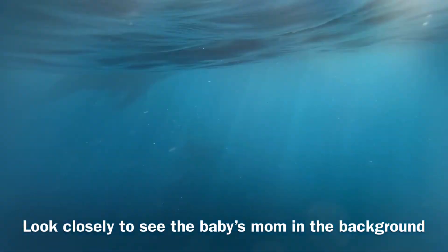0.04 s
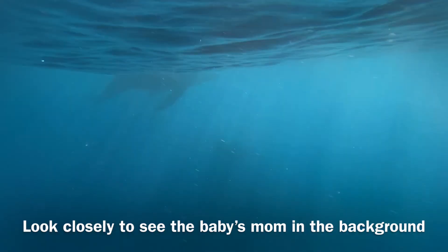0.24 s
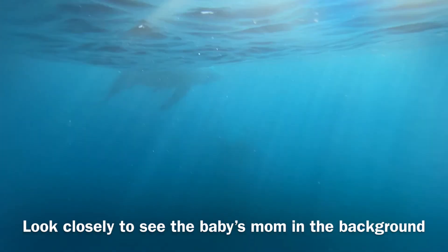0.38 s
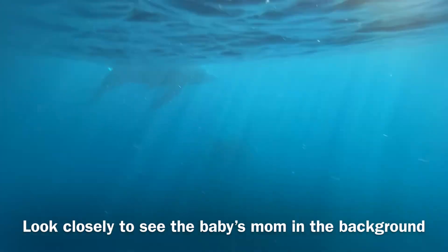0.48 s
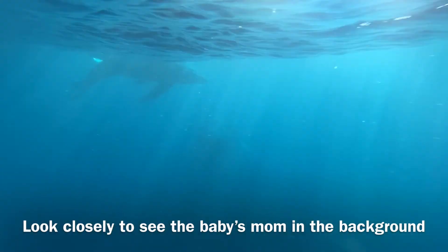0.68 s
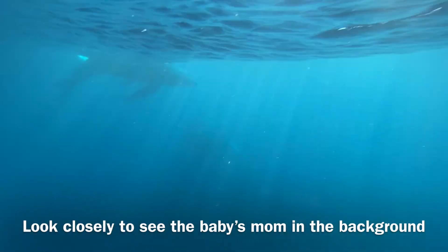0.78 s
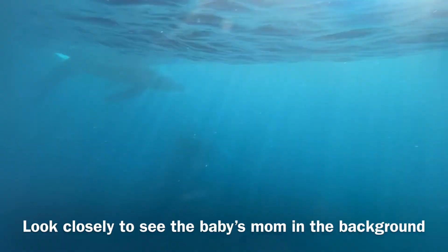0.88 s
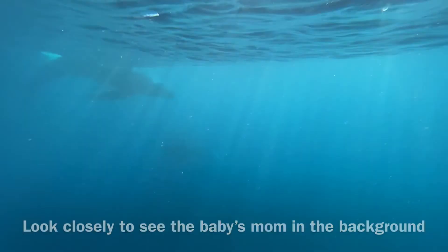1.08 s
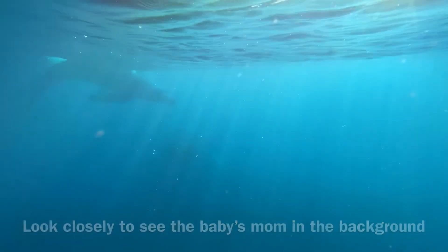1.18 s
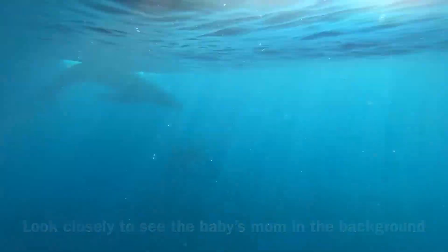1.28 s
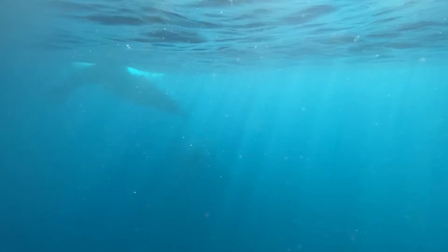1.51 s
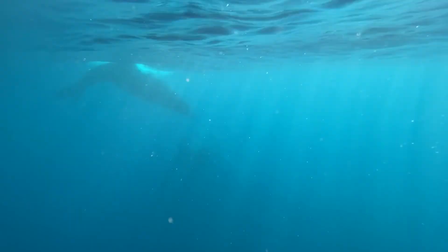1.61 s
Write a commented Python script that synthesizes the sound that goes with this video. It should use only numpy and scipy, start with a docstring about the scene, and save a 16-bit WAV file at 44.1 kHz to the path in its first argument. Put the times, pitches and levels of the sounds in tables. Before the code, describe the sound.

Close underwater stereo sound in open sea: a nasal, droning whale moan swells and creeps upward with faint throbs and small bubble blips, then loud deep glugs break over its end, leaving quiet sloshing water.

```python
"""A whale's held moan under water, close to a camera housing that hears through a left and a right port.
The moan is a summed fundamental and overtones: its pitch creeps up through fixed resonances and pulses make it buzzy.
Low throbs, single swings of pressure, pulse under it; single bubbles small and large ring, and ticks die at once.
Behind it water sloshes as shaped noise, and a burst of big bubbles, many short rings, gurgles and dies away."""
import sys
import numpy as np
from scipy import signal
from scipy.fft import rfft, irfft, next_fast_len
from scipy.io import wavfile
from scipy.ndimage import uniform_filter1d, minimum_filter1d, map_coordinates

SR = 44100
rng = np.random.default_rng(int(sys.argv[2]) if len(sys.argv) > 2 else 0)


def wrap_up_sound(samples):
    """Save the sound to the file named by the first command line argument, as 16-bit audio."""
    columns = np.atleast_2d(samples).T
    # keep every value between -1 and 1, then stretch to whole-number steps
    tamed = np.clip(columns, -1, 1)
    steps = np.round(tamed * 32767).astype(np.int16)
    wavfile.write(sys.argv[1], SR, steps)


N = 72765


def amp(db):
    """Decibels to a linear factor."""
    return 10 ** (np.asarray(db) / 20)


def unit(x):
    """x at an RMS level of one."""
    return x / np.sqrt(np.mean(x ** 2) + 1e-20)


def along(points, hz):
    """Read (frequency [Hz], value) points on a log frequency axis."""
    f, v = np.transpose(points)
    return np.interp(np.log(hz + 1), np.log(f + 1), v)


def curves(rows):
    """One value per sample for each column after the time."""
    s, *cols = np.transpose(rows)
    return [np.interp(np.arange(N) / SR, s, c) for c in cols]


def wobble(rate, count=1):
    """Random curves made of straight lines between knots, rate knots a second."""
    knots = rng.standard_normal((count, 200))
    return [np.interp(np.arange(N) * rate / SR, np.arange(200), row) for row in knots]


def filtered(x, response):
    """x times a complex response of frequency; mirrored ends run out smoothly so that they do not click."""
    edge = 4096
    x = np.pad(x, [(0, 0)] * (x.ndim - 1) + [(edge, edge)], mode="reflect")
    x = x * signal.windows.tukey(N + 2 * edge, 2 * edge / (N + 2 * edge))
    m = next_fast_len(N + 2 * edge)
    return irfft(rfft(x, m) * response(np.fft.rfftfreq(m, 1 / SR)), m)[..., edge:edge + N]


def add(track, s, sound):
    """Mix a short sound in at a time in seconds."""
    part = track[max(round(s * SR), 0):][:len(sound)]
    part += sound[:len(part)]


def patchy(x, db):
    """x with slowly shifting patches of random gain over time and frequency."""
    z = signal.stft(x, nperseg=512, boundary="even")[2]
    field = uniform_filter1d(rng.standard_normal(z.shape), size=6, axis=0)
    field = uniform_filter1d(field, size=10, axis=1)
    return signal.istft(z * amp(db * unit(field)), nperseg=512)[1][:N]


PATCHY_DB = 4  # spread of the patches in the slosh and the breath

# Gurgling at the housing, before the mix: (time [s], level [dB])
GURGLE_LEVEL = [(0, -47.5), (.06, -45), (.13, -40), (.3, -31), (.925, -32.5), (.955, -11.5), (1.03, -14.5),
                (1.13, -15.5), (1.22, -20), (1.33, -25.5), (1.45, -34), (1.55, -37.5), (1.65, -37)]
# Colour of the sloshing water: (frequency [Hz], gain [dB])
SLOSH_COLOUR = [(15, -48.5), (25, -29.5), (60, 13), (120, -17), (250, -10.5), (320, -13), (380, -20.5),
                (500, -32.5), (800, -26), (1100, -41.5), (8500, -71.5), (10500, -76.5)]
SLOSH_DB, SLOSH_GROWS = -7, 0.44  # against the loudest gurgle; share of its dB swing that the slosh follows
GLUG_COUNT, GLUG_HZ, GLUG_SPREAD = 500, 183.1, 0.464  # middle pitch [Hz]; spread in log pitch
GLUG_CYCLES, GLUG_SIZE_DB = 1.65, 2  # cycles in one unit of decay time; scale of the random extra level


def gurgle():
    """Big bubbles ring for a few cycles over sloshing water, whose level swings less."""
    level_db, = curves(GURGLE_LEVEL)
    glugs, t = np.zeros(N), np.arange(3000) / SR
    for s, pitch, size in rng.random((GLUG_COUNT, 3)):
        hz = GLUG_HZ * np.exp(GLUG_SPREAD * np.log(pitch / (1 - pitch)) / 2)
        u = t * hz / GLUG_CYCLES
        swell_and_decay = u * np.exp(-np.e * u)
        loudness = amp(-GLUG_SIZE_DB * np.log(size))
        add(glugs, s * N / SR, loudness * swell_and_decay * np.sin(2 * np.pi * hz * t))
    glugs = filtered(glugs, lambda f: 1 / (1 + (f / 340) ** 8))  # dull above 340 Hz
    slosh = filtered(rng.standard_normal(N), lambda f: amp(along(SLOSH_COLOUR, f)))
    slosh = patchy(slosh, PATCHY_DB)
    loudest = level_db.max()
    slosh_db = SLOSH_DB + loudest + SLOSH_GROWS * (level_db - loudest)
    return amp(level_db) * unit(glugs) + amp(slosh_db) * unit(slosh)


BLIP_RISE, BLIP_ATTACK_S = 0.053, 0.0015  # rise of the mean pitch over one t60 [share]; attack [s]
BLIP_ROUGH, BLIP_ROUGH_HZ = 0.077, 150  # depth of the unsteady level; knots a second


def bubble(db, hz, t60):
    """A bubble's soft-starting, unsteady ring: it dies away exponentially and its pitch rises a little."""
    t = np.arange(8000) / SR
    rough = 1 + BLIP_ROUGH * map_coordinates(rng.standard_normal(100), [t * BLIP_ROUGH_HZ])
    attack = (1 - np.exp(-t / BLIP_ATTACK_S)) ** 2
    cycles = hz * t * (1 + BLIP_RISE * t / t60)
    return amp(db - 60 * t / t60) * attack * rough * np.sin(2 * np.pi * cycles)


# Ringing bubbles small and large, before attack and mix:
# (time [s], level [dB], starting pitch [Hz], decay by 60 dB [s])
BUBBLES_HEARD = [(.388, 0, 586, 0.0064), (.452, 5, 316, 0.021), (.533, 6.5, 474, 0.016),
                 (0.955, 0, 163.5, 0.23), (.965, -4, 464, 0.032), (.995, 1.5, 278.7, 0.07),
                 (1.012, 0.5, 156.4, 0.057), (1.103, -8.5, 182.5, 0.091), (1.105, -7.5, 483, 0.025),
                 (1.134, -18, 805, .05), (1.16, -7, 275.3, 0.092), (1.165, -17, 155, 0.21),
                 (1.31, -13, 254, 0.047), (1.385, -16, 770, 0.05)]
# Ticks, before filter and mix: (time [s], level of the tone [dB], pitch [Hz])
TICKS_HEARD = [(0.132, -30, 1690), (1.109, -25.5, 4700), (1.237, -43, 4780), (1.308, -28, 1735),
               (1.434, -47.5, 5800), (1.619, -46.5, 1748)]
TICK_T60_S, TICK_TOP_HZ, TICK_HISS = 0.028, 8800, .7  # decay by 60 dB; upper limit; RMS of hiss


def single_bubbles():
    """Bubbles small and large ring, and ticks, a tone and hiss, die almost at once."""
    rings, ticks, t = np.zeros(N), np.zeros(N), np.arange(1500) / SR
    for s, db, hz, t60 in BUBBLES_HEARD:
        add(rings, s, bubble(db, hz, t60))
    for s, db, hz in TICKS_HEARD:
        # averaging over a third of a cycle softens the hiss
        hiss = unit(uniform_filter1d(rng.standard_normal(len(t)), size=int(SR / hz / 3) + 1))
        tone = np.sin(2 * np.pi * hz * t)
        add(ticks, s, amp(db - 60 * t / TICK_T60_S) * (tone + TICK_HISS * hiss))
    return rings + filtered(ticks, lambda f: (f / (f + 900)) ** 2 / (1 + (f / TICK_TOP_HZ) ** 16))


# Throbs under the moan, before the mix: (time [s], level of each push alone [dB])
THROBS_HEARD = [(0.14, -27.5), (0.186, -16), (0.23, -14), (0.305, -17), (0.341, -9), (0.389, -15),
                (0.439, -14), (0.507, -30), (0.551, -23), (0.598, -23), (0.645, -12), (0.693, -20),
                (0.791, -17.5), (0.842, -13.5), (0.952, -15.5), (1, -17), (1.043, -21.5), (1.093, -24),
                (1.131, -11.5), (1.195, -21.5), (1.229, -21), (1.27, -24.5), (1.309, -15.5), (1.359, -14.5),
                (1.439, -24), (1.481, -17.5), (1.543, -23.5)]
THROB_HZ, THROB_S = 69.3, 0.0052  # pitch; standard deviation of the bell-shaped envelope


def throbs():
    """Single slow pushes of pressure: a low cosine under a bell-shaped envelope."""
    out, t = np.zeros(N), np.arange(-2000, 2000) / SR
    for s, db in THROBS_HEARD:
        bell = np.exp(-(t / THROB_S) ** 2 / 2)
        add(out, s + t[0], amp(db) * bell * np.cos(2 * np.pi * THROB_HZ * t))
    return out


ECHO_DB, ECHO_T60_S = -15, .15  # energy of the tail against the direct sound; decay by 60 dB


def echo(x):
    """Surface and housing blur the buzz with a short tail of decaying noise."""
    t = np.arange(SR // 4) / SR
    tail = amp(-60 * t / ECHO_T60_S) * rng.standard_normal(len(t))
    return x + amp(ECHO_DB) * signal.fftconvolve(x, tail / np.linalg.norm(tail))[:N]


# The whale's voice, before the mix: (time [s], pitch [Hz], fundamental [dB], overtones [dB],
# buzz [dB], extra gain on the top of the buzz [dB])
MOAN_COURSE = [(0, 131.4, -71.5, -10, -60, 9), (.1, 133.1, -40.5, -11.5, -60.5, -0.5),
               (.2, 139.4, -24, -3.5, -62.5, 6), (.28, 146.5, -19, -3.5, -49.5, -1),
               (.39, 148.6, -12, -3, -48.5, 4), (.46, 148.9, -9.5, 1.5, -46, -7.5),
               (.53, 150, -10.5, 0, -45.5, -6.5), (.65, 153.5, -9, 5, -42, -9.5),
               (.74, 156.7, -9.5, 5.5, -38, -17.5), (.79, 156.4, -9, 6.5, -36.5, -2.5),
               (.85, 158.5, -10, 6, -33.5, -3.5), (.955, 159.7, -9, 2, -38.5, 15.5),
               (1.0, 163, -9, 6.5, -35, 10), (1.09, 165.8, -33, 2, -42, 11),
               (1.14, 171.2, -9, -4.5, -50.5, 6.5), (1.19, 170.7, -40, -1, -62.5, 12.5),
               (1.29, 177, -73, -26.5, -74.5, 0)]
# Fixed resonances that an overtone meets: (frequency [Hz], gain [dB])
BODY_RESONANCES = [(260, -28), (282, -21.5), (296, -28.5), (318, -20.5), (415, -26), (440, -34.5),
                   (475, -66.5), (560, -42), (615, -41.5), (638, -22.5), (660, -43.5), (710, -27.5),
                   (750, -46), (798, -42.5), (860, -29.5), (905, -33), (950, -44), (1050, -49.5),
                   (1150, -41.5), (1250, -48.5), (1350, -61.5), (1500, -54), (1640, -52.5), (1790, -49),
                   (2120, -55), (2330, -59.5), (2750, -58.5), (3100, -53.5), (3500, -120)]
# Single overtones swell or dip: (time [s], standard deviation [s], frequency [Hz], gain [dB])
OVERTONE_SWELLS = [(.27, 0.013, 840, 9), (.37, 0.14, 1600, 17), (.42, 0.2, 1879, 8.5), (.56, 0.027, 880, 7),
                   (0.15, 0.051, 405, 7.5), (.7, 0.046, 1810, -7), (.78, .05, 1565, 10.5),
                   (.83, 0.028, 942, 8.5), (.93, 0.026, 790, 16), (1.0, 0.017, 1423, 17)]
# Colour of the buzz: (frequency [Hz], gain [dB])
BUZZ_COLOUR = [(1500, -47.5), (2700, -6.5), (3250, 3.5), (3900, -2), (5500, -2), (6300, -11), (7300, -13),
               (7800, -21.5), (9300, -37), (10000, -78.5)]
# Colour of the breath: (frequency [Hz], gain [dB])
BREATH_COLOUR = [(200, -29.5), (350, 5.5), (750, -6), (1150, -7), (1600, -16), (2300, -13), (2800, -37)]
SWELL_HZ, UPPER_GROWS, OVERTONE_LAG_RAD = 67, 1, -0.308  # reach of a swell; dB per overtone dB; lag per order
BREATH_DB, BREATH_GROWS = -42, 1  # breath when overtones are at 0 dB; dB per overtone dB
WAVER_DB, WAVER_PER_S = 3.5, 10  # unsteady overtone level; knots a second
DRIFT_RAD, SHAKE_RAD, SHAKE_PER_S = 1.5, .45, 60  # slow and fast phase wander; knots a second of the fast one
CRISP_ORDER = 44  # from this overtone up the hardened pulses stay in step
CRISP_FROM_S, CRISP_RISE_S = .65, .25  # the buzz hardens from hiss into pulses
RASP_DB, GATE_SHARP, PULSE_SCATTER_DB = -2, 4, 2  # rasp against pulses; narrowness; spread of pulse sizes
BUZZ_TOP_HZ = 5470  # the top of the buzz lies above this


def moan():
    """A clean fundamental, unsteady overtones and breath coloured by the body, and a buzz once a cycle."""
    hz, low_db, over_db, buzz_db, top_db = curves(MOAN_COURSE)
    turn = 2 * np.pi * np.cumsum(hz) / SR
    over, pulses, t = np.zeros(N), np.zeros(N), np.arange(N) / SR
    crisp = np.clip((t - CRISP_FROM_S) / CRISP_RISE_S, 0, 1)
    slow, fast = wobble(WAVER_PER_S, count=128), wobble(SHAKE_PER_S, count=64)
    for k in range(2, 64):
        in_step = crisp * np.clip(3 * k / CRISP_ORDER - 2, 0, 1)
        loose = min((k - 2) / 10, 1) * (1 - in_step)
        wander = loose * (DRIFT_RAD * slow[64 + k] + SHAKE_RAD * fast[k])
        partial = np.cos(k * (turn - OVERTONE_LAG_RAD) + wander)
        if k < 26:
            swell_db = sum(db * np.exp(-((t - s) / half) ** 2 / 2 - ((k * hz - at) / SWELL_HZ) ** 2)
                           for s, half, at, db in OVERTONE_SWELLS)
            # high overtones need more effort
            late_db = UPPER_GROWS * np.minimum(over_db, 0) * (k > 3)
            waver_db = WAVER_DB * loose * slow[k]
            over += amp(along(BODY_RESONANCES, k * hz) + swell_db + late_db + waver_db) * partial
        pulses += partial

    breath = filtered(rng.standard_normal(N), lambda f: amp(along(BREATH_COLOUR, f)))
    breath = unit(patchy(breath, PATCHY_DB))

    # rasp: noise gated once a cycle, more sharply as the buzz hardens, at an even loudness
    gate = np.exp(GATE_SHARP * crisp * np.cos(turn))
    rasp = gate / np.sqrt(uniform_filter1d(gate ** 2, size=600)) * rng.standard_normal(N)

    # each cycle gets its own random size
    cycle = np.round(turn / (2 * np.pi)).astype(int)
    sizes = amp(PULSE_SCATTER_DB * rng.standard_normal(400))[cycle]
    buzz = sizes ** crisp * (unit(pulses) + amp(RASP_DB) * rasp)
    buzz = unit(filtered(patchy(buzz, PATCHY_DB / 2), lambda f: amp(along(BUZZ_COLOUR, f))))
    top = filtered(buzz, lambda f: 1 / (1 + (BUZZ_TOP_HZ / (f + 1)) ** 10))
    buzz = amp(buzz_db) * (buzz + (amp(top_db) - 1) * top)

    upper = amp(over_db) * over + amp(BREATH_DB + BREATH_GROWS * over_db) * breath
    return amp(low_db) * np.cos(turn) + upper + echo(buzz)


# Left port against right: (frequency [Hz], level [dB])
LEFT_GAIN = [(60, 5), (155, 5.5), (310, 2), (420, -3.5), (620, -1.5), (790, 2.5), (950, -1), (1500, 2),
             (2200, 8.5), (2900, 0), (3500, -3), (4260, -15), (5910, -27.5), (8210, -14)]
# Left port against right: (frequency [Hz], phase lead of the left [rad])
LEFT_LEAD = [(0, 1), (100, 0), (155, .85), (310, 2), (430, 2.75), (650, 3.3), (790, 4), (1400, 4.8),
             (1620, 8.6), (1950, 10.3), (3600, 7.9), (5680, .5), (6720, -2.5), (8350, -27)]


def ports(x):
    """The housing hands the sound to each port with its own gain and phase; the right is the reference."""
    def left(f):
        return amp(along(LEFT_GAIN, f)) * np.exp(1j * np.interp(f, *np.transpose(LEFT_LEAD)))
    return np.array([filtered(x, left), x])


# Water that each port hears alone: (frequency [Hz], share of the power [0-1])
PORTS_APART = [(25, 0.32), (110, 0.64), (150, 0.11), (500, 0.9), (4000, 1), (8000, 0.68)]


def scene():
    """Water partly separate at the two ports, with moan, throbs and single bubbles common to both."""
    def share(f):
        return np.clip(along(PORTS_APART, f), 0, 1)
    shared = gurgle()
    alone = np.array([gurgle(), gurgle()]) * amp([[3], [-3]])  # left louder than right
    water = ports(filtered(shared, lambda f: np.sqrt(1 - share(f))))
    water = water + filtered(alone, lambda f: np.sqrt(share(f)))
    near = ports(amp(-4.5) * (moan() + throbs() + single_bubbles()))
    return near + amp(-2.5) * water


LIMIT, TOP_HZ, FADE_S = .9, 12350, .012  # peak limit before the band limit; band limit; fade at the end


def record(dry):
    """A limiter shared by both ports holds the peaks; nothing passes the band limit; the end fades."""
    need = np.minimum(1, LIMIT / (abs(dry).max(axis=0) + 1e-9))
    held = dry * uniform_filter1d(minimum_filter1d(need, size=1200), size=600)
    fade = np.minimum(1, np.arange(N)[::-1] / (FADE_S * SR))
    return filtered(held, lambda hz: hz < TOP_HZ) * fade


dry = scene()
out = record(dry)
wrap_up_sound(out)
```